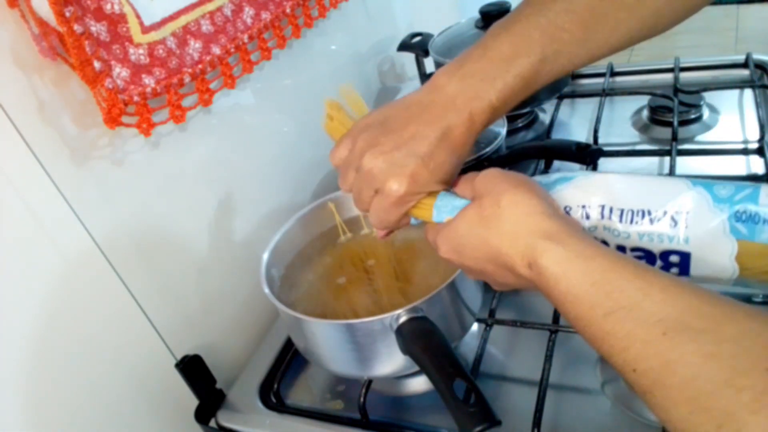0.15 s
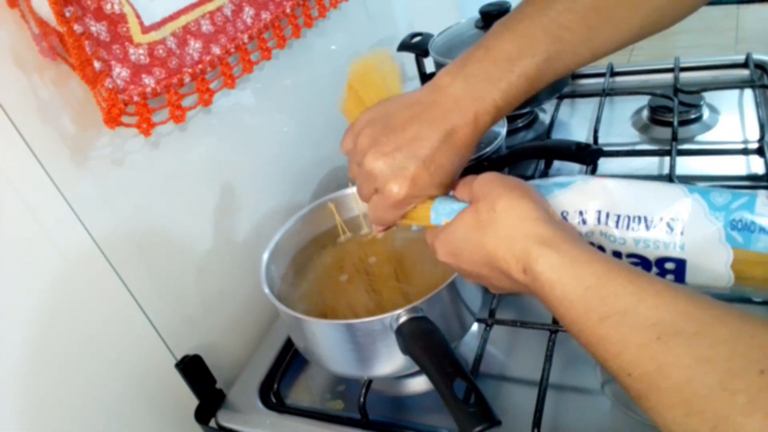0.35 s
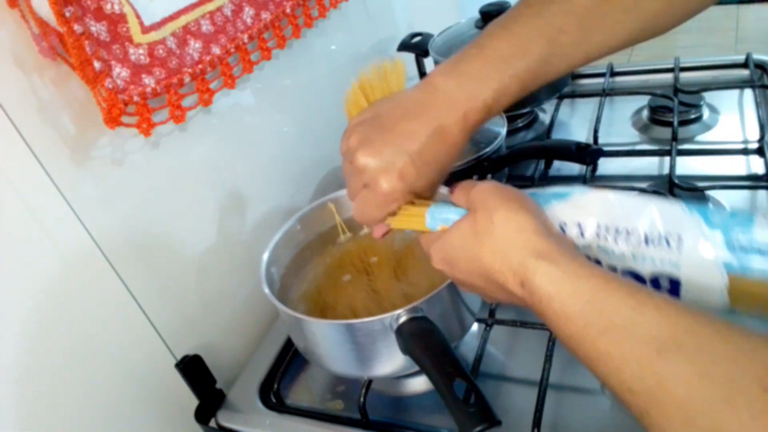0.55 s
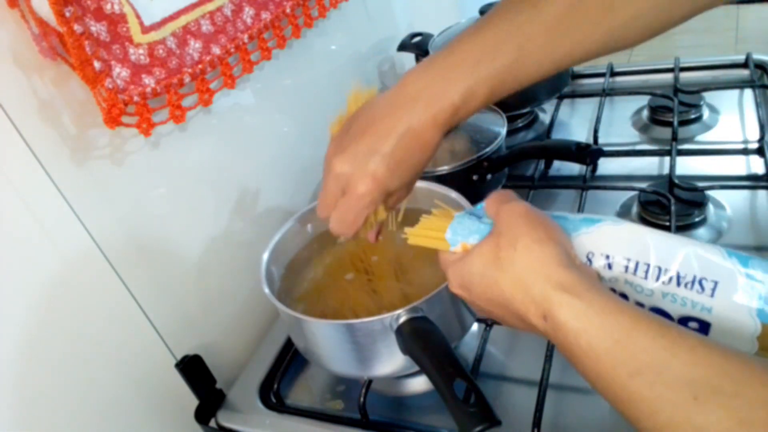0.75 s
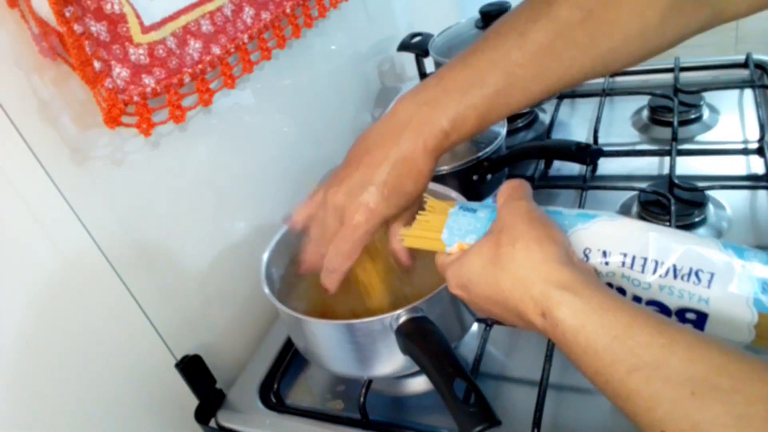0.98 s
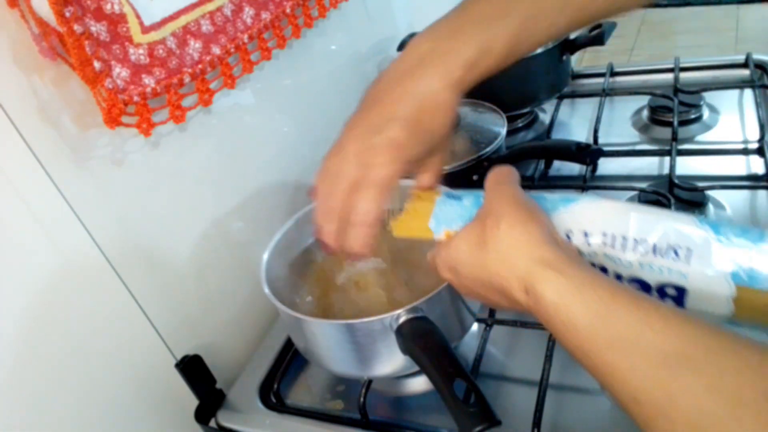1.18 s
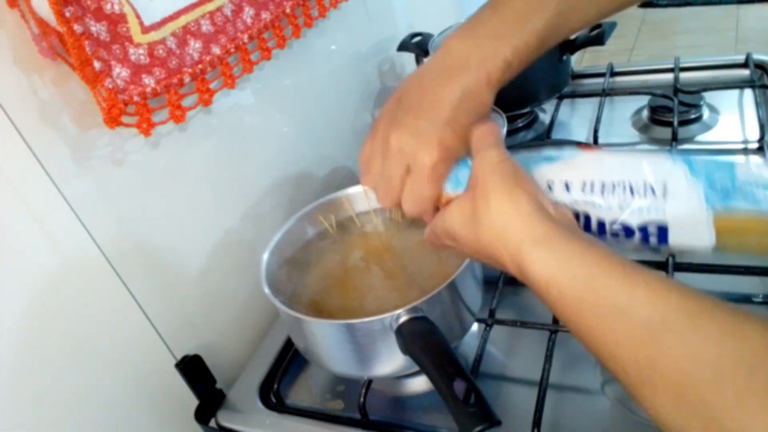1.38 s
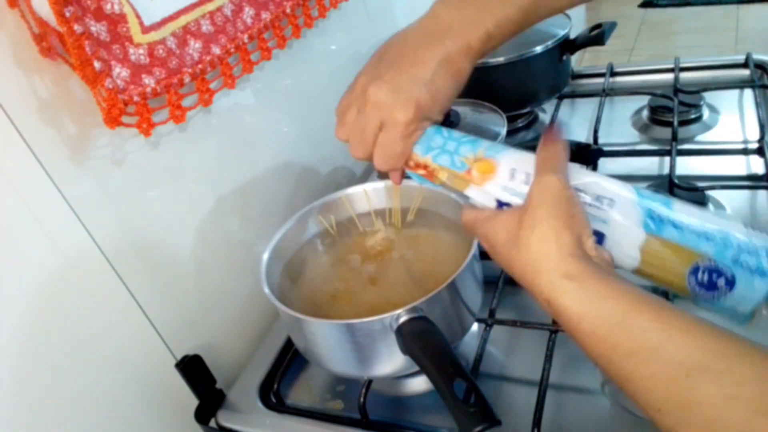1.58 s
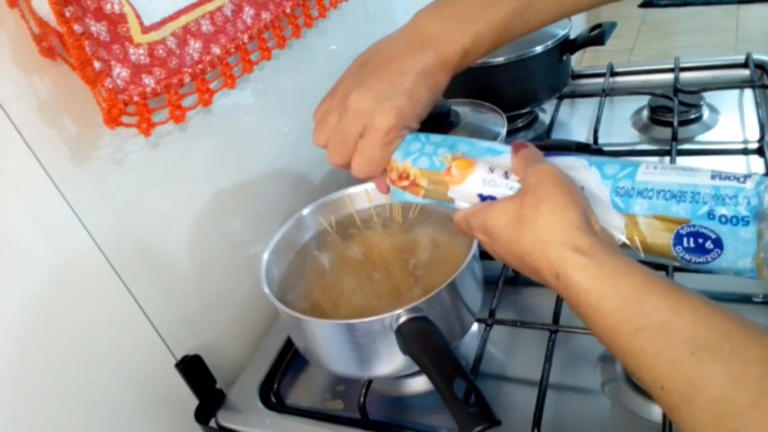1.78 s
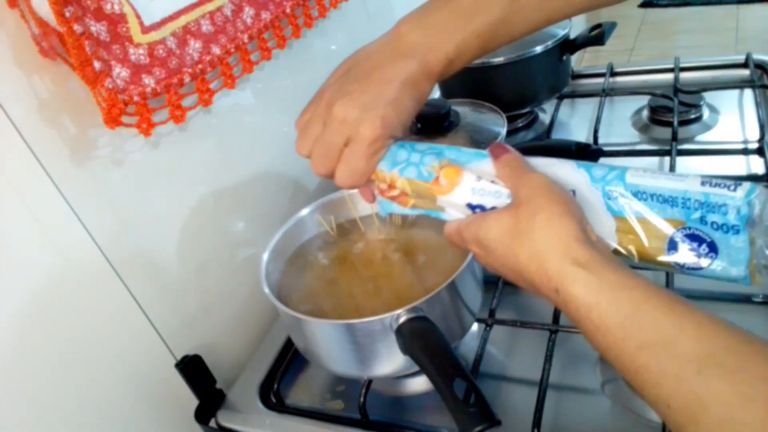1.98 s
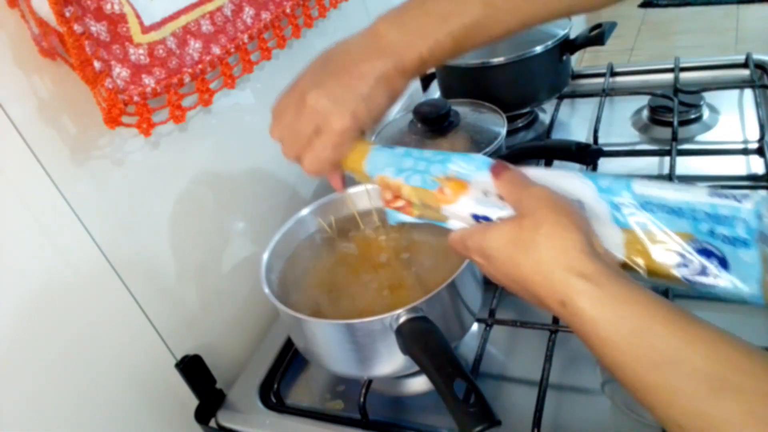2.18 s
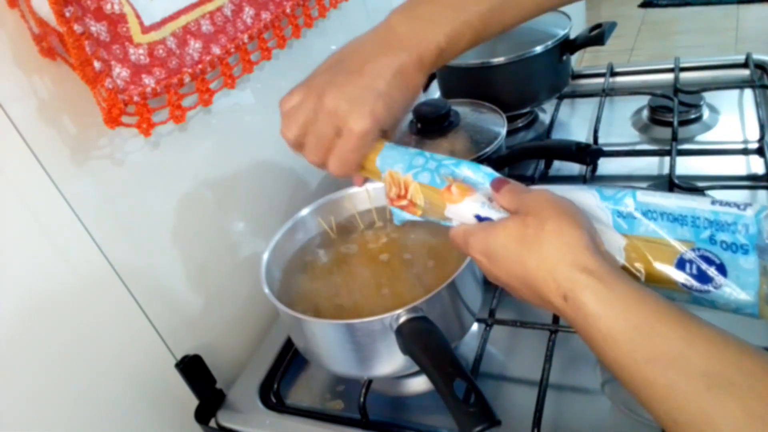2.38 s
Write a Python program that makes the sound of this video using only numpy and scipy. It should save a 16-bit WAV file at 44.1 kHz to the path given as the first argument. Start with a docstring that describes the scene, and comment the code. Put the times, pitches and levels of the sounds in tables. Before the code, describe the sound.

Dry spaghetti snapping in a rapid crackling burst over a pot, then a plastic packet crinkling

```python
"""Dry spaghetti snaps first: a bundle bent over a pot breaks strand after strand, then stragglers crack.
Each break is a noise click and a dying spray of splinters, high-passed at the strand's lowest note.
The jarred pot rings faintly as beating sines; later the pieces slide in as a hiss of random ticks.
The plastic packet is then gripped: ticks through wandering resonances crinkle, and single creases pop.
A tiled kitchen answers with decaying noise echoes, over a faint steady hush and hum."""
import sys
import numpy as np
from scipy import signal
from scipy.io import wavfile
from scipy.ndimage import uniform_filter1d, map_coordinates

SR = 44100
rng = np.random.default_rng(int(sys.argv[2]) if len(sys.argv) > 2 else 0)


def wav_out(sig):
    """Save sig, one row per channel (or a flat mono array), as 16-bit PCM at SR to the path in sys.argv[1]."""
    wavfile.write(sys.argv[1], SR, np.round(np.clip(np.atleast_2d(sig).T, -1, 1) * 32767).astype(np.int16))


N = 108045
TIME = np.arange(N) / SR  # s

# Strands breaking. Each row: start in seconds, level in dB, fade time in seconds.
STRAND_BREAKS = [(.010,-47,0.00093),(0.081,-48,0.0086),(0.0922,-39.5,0.0062),(0.1054,-27.5,0.0012),(.113,-37.5,0.025),(0.118,-51,0.0019),
                 (0.1617,-19,0.00078),(0.1687,-22.5,0.0008),(0.1778,-16.5,0.00079),(.1955,-20,.0004),(0.2095,-33,0.00045),(0.202,-26,0.0051),(.217,-23,0.0016),(0.2186,-20.5,0.0028),(0.2372,-23,0.00065),(0.241,-23.5,0.002),
                 (0.2639,-19,0.0014),(0.267,-24,0.0027),(0.2754,-17.5,0.002),(.300,-18,0.0023),(0.308,-22.5,0.005),(0.317,-26,0.0016),(0.3248,-12,0.0017),(.332,-30,0.005),(0.3408,-19.5,0.001),(.346,-22,0.0065),
                 (0.3723,-19.5,.005),(.381,-18,0.0016),(0.385,-21.5,0.00095),(0.4001,-22.5,0.0032),(.4054,-6.5,0.00022),(.412,-21,0.0039),(.4228,-15.5,0.0013),(0.4252,-13.5,0.0038),(.4305,-14,0.0022),
                 (0.5855,-40.5,0.0014),(.6112,-41.5,0.0039),(0.6451,-46.5,0.003),(.7168,-50,0.0022)]
# Last strands cracking inside the fist; the final two rows are broken pieces tapping.
# Each row: start in seconds, level in dB before FIST_DB is added, fade time in seconds.
LAST_CRACKS_AND_TAPS = [(0.7839,-34.5,0.00064),(0.79,-41.5,0.0022),(0.8083,-32.5,0.0013),(0.814,-40,.0009),(0.8613,-38.5,0.0021),(0.8734,-38,0.00093),(.888,-43,0.0021),(0.9038,-44,0.0015),(.911,-43,0.0027),(0.997,-52,0.0012),(1.0177,-46,0.0014)]
# Lowest note of a break, falling as the bundle opens. Each row: time in seconds, frequency in Hz.
LOWEST_NOTE = [(.08,2250),(.22,2200),(.29,1820),(.325,1410),(.35,700),(.40,620),(.43,430)]
# Spectrum of breaking pasta. Each row: frequency in Hz, relative level in dB.
PASTA_SPECTRUM = [(200,-24.5),(450,-19.5),(750,-8),(1200,-11.5),(2000,-9),(2800,-6.5),(4600,-1),(7000,-1),(8500,1),(12500,-0.5),(16000,-2)]
# Resonances of pieces held in the fist. Each row: frequency in Hz, width in Hz, level in dB.
STUB_RESONANCES = [(3070,120,7.5),(4090,46,-7),(4830,51,7),(5580,160,9),(7460,910,2)]
# Fine splintering and rubbing of the broken ends. Each row: time in seconds, level in dB.
STRAIN_LEVEL = [(.162,-36.5),(.19,-40),(.29,-44.5),(.31,-32),(.36,-44),(.40,-28),(.435,-39),(.48,-45),(.55,-57.5),(.61,-52),(.66,-51.5),(.69,-110)]
FIST_HZ, FIST_DB = 3320, 2.5  # lowest note and added level of the last cracks and taps
THUD_DB = -14.5  # gain left below the lowest note
STRAIN_PER_S, SPLINTERS_PER_S, SPLINTER_SPREAD_DB = 2000, 14000, -0.5
CRACK_S, SPRAY_RISE_S = 0.00031, 0.0012  # decay of the click, rise of the splinter spray
CLEAN_BREAK_S = 0.00046  # fade time at which click and spray share the energy equally
GRAIN_S = 0.00013  # decay of one tick

# Dull rustle of the hands as the bundle gives way. Each row: time in seconds, level in dB.
HANDS_LEVEL = [(.28,-94),(.325,-66),(.37,-81),(.41,-85),(.435,-60),(.485,-57.5),(.53,-63.5),(.60,-74),(.68,-103)]
# Spectrum of that rustle. Each row: frequency in Hz, relative level in dB.
HANDS_SPECTRUM = [(40,-27),(110,-20),(200,-10),(330,1.5),(500,5.5),(900,-6),(3000,-22.5),(16000,-43)]

# Broken pieces sliding into the pot. Each row: time in seconds, level in dB.
SLIDE_LEVEL = [(.992,-78),(1.0,-62),(1.007,-48),(1.019,-53.5),(1.026,-71),(1.04,-59),(1.06,-48),(1.088,-47),(1.12,-53.5),(1.17,-64.5),(1.22,-100)]
# Spectrum of the slide. Each row: frequency in Hz, relative level in dB.
SLIDE_SPECTRUM = [(200,-28),(1000,-10.5),(2000,-13.5),(4000,-8),(5600,-6),(7400,-13),(8200,3),(9500,5.5),(11000,-2),(16000,-3)]
# Resonances of the sliding pieces. Each row: frequency in Hz, width in Hz, level in dB.
SLIDE_RESONANCES = [(2000,56,5),(2690,49,9.5),(4050,45,3),(5600,60,6),(6040,50,3),(6500,60,11.5)]
SLIDE_PER_S, SLIDE_SPREAD_DB = 7800, 0.5

# Film rubbing on pasta. Each row: time in seconds, level of the crinkle in dB,
# level of the packet's hollow body in dB before its low cut.
HANDLING_LEVELS = [(1.37,-76,-82.5),(1.42,-65.5,-71),(1.46,-52,-63),(1.515,-43.5,-60.5),(1.558,-39.5,-61.5),(1.615,-43.5,-56),(1.627,-30,-43.5),(1.65,-46,-44.5),(1.67,-46.5,-57),(1.70,-38,-46.5),(1.72,-49.5,-54.5),(1.79,-45,-52.5),(1.85,-52.5,-67.5),(1.915,-50.5,-67),(1.95,-103,-68.5),(2.05,-63,-62),(2.08,-52,-67),(2.125,-51,-53),(2.16,-63,-70),(2.245,-49,-70),(2.29,-52.5,-64),(2.32,-62.5,-74),(2.45,-57,-55)]
# Spectrum of the film crinkle. Each row: frequency in Hz, relative level in dB.
FILM_SPECTRUM = [(200,-28.5),(800,-25.5),(1300,-4),(2000,-5.5),(3200,-0.5),(4400,-1.5),(6200,0.5),(7600,-7.5),(9400,0),(10800,-1.5),(12300,-5),(16000,-15.5)]
# Spectrum of the hollow body. Each row: frequency in Hz, relative level in dB.
BODY_SPECTRUM = [(120,-46),(240,-15),(400,5.5),(650,5.5),(900,-5.5),(1220,1),(1600,-6),(2600,-6),(6000,-18),(16000,-15)]
# Resonances of the film. Each row: frequency in Hz, width in Hz, level in dB.
FILM_RESONANCES = [(1190,204,0.5),(1946,290,1.5),(2540,130,-7.5),(4150,85,4.5),(5500,93,-16),(6320,200,-14.5),(9300,340,-5)]
# Lowest note of the packet as the grip shifts. Each row: time in seconds, frequency in Hz.
BODY_LOWEST_NOTE = [(1.4,330),(1.55,500),(1.64,330),(1.92,338),(2.08,1000),(2.45,1110)]
# Creases popping over. Each row: start in seconds, level in dB, pitch in Hz, fade time in seconds.
CREASE_POPS = [(1.2524,-49.5,12600,0.0012),(1.3793,-52.5,7000,0.0027),(1.392,-49,4000,0.0032),(1.430,-50,2000,0.0024),(1.477,-41,5950,0.0017),(1.526,-35,7000,0.0033),(1.552,-31.5,6900,0.0049),(1.563,-31,6500,0.0023),(1.6392,-26.5,8000,0.0077),
               (1.697,-33.5,1570,0.0021),(1.7132,-27.5,9100,0.0016),(1.726,-25,8900,0.0016),(1.746,-28.5,8000,0.0019),(1.760,-26,7940,0.0011),(1.775,-26.5,8450,0.00098),(1.791,-32,7000,0.0018),(1.808,-21,13700,0.00067),(1.8418,-45.5,970,0.0027),(1.8549,-33,4170,0.0013),(1.902,-42.5,540,0.0028),(1.9217,-35.5,5640,0.001),
               (1.9697,-42,10000,0.00068),(1.9995,-41,4420,0.003),(2.0366,-52,9100,.0006),(2.0474,-37.5,5500,0.0009),(2.061,-39,4500,0.0021),(2.07,-36.5,6500,0.00083),(2.0762,-35.5,2200,0.00087),(2.0855,-26.5,3750,0.0007),(2.130,-39.5,2500,0.0011),(2.1183,-35.5,6200,0.0013),(2.177,-43,8150,0.0016),(2.1948,-32.5,12200,0.0022),(2.245,-37.5,7100,0.0014),(2.2717,-40.5,6000,0.00074),(2.288,-37.5,9100,0.00081),(2.295,-40.5,1660,0.0018),(2.3442,-45,8000,0.0024),(2.392,-47,4200,0.0025)]
CRINKLES_PER_S, CRINKLE_SPREAD_DB = 1500, 3.5  # rate before the grip scales it
BODY_PER_S, BODY_SPREAD_DB = 3500, 3
LIGHT_GRIP_DB, CROWDING = -50, 1.2  # above a light grip the crinkles crowd together
CREASE_OCTAVES, CREASE_LOW_HZ = 1.14, 438  # breadth of a pop's spectrum, low cut
FLEX_SHARE, FLEX_S = 0.03525, 0.03  # rms pitch change as a fraction, length of each smoothing pass

# Reverberation time of the kitchen. Each row: frequency in Hz, time to fall 60 dB in seconds.
ROOM_T60 = [(250,1),(660,0.4),(1740,0.87),(4600,0.38),(9000,0.3951),(15000,0.1)]
# Spectrum of the reverberant tail. Each row: frequency in Hz, level in dB.
ROOM_SPECTRUM = [(250,-3.5),(1000,1),(4000,-2.5),(9000,-5),(16000,-4)]
NEAR_PER_S, NEAR_SPREAD_DB = 2500, 5
NEAR_DB, NEAR_S, WALL_S = -8.5, 0.011, 0.0022  # level and decay of near echoes, onset of the tail
CYCLE_HZ = 7  # rate at which the echo patterns take turns

# Faint rings of the jarred pot. Each row: start in seconds, frequency in Hz, level in dB,
# time to fall 60 dB in seconds.
POT_RINGS = [(.426,1440,-63,1.0),(0.688,1404,-63,1)]
POT_BEAT_HZ, POT_BEAT_DB = 7, -14  # spacing and relative level of the second mode

# Spectrum of the steady hush. Each row: frequency in Hz, relative level in dB per Hz.
FLOOR_SPECTRUM = [(15, -16.5), (25, -11.5), (87, -9), (170, -30.5), (223, -6), (641, -5.5), (962, -7.5),
                  (1070, -7.5), (1330, -5), (1610, -12.5), (16000, -16.5)]
FLOOR_DB, HUM_HZ, HUM_DB = -68.5, 67.4, -95
EDGE_HZ = 15800  # upper band limit


def strands():
    """Brittle fracture: strain releases fine splinter ticks, strands crack, and last pieces tap."""
    splintering = grains(STRAIN_PER_S, SPLINTER_SPREAD_DB, N) * level(STRAIN_LEVEL, 1)
    out = colour(splintering, pasta_tone(FIST_HZ))
    for s, db, fade_s in STRAND_BREAKS:
        low_hz = np.interp(s, *np.transpose(LOWEST_NOTE))
        add(out, s, amp(db) * colour(crack(fade_s), pasta_tone(low_hz)))
    for s, db, fade_s in LAST_CRACKS_AND_TAPS:
        tone = pasta_tone(FIST_HZ, STUB_RESONANCES, order=10)
        add(out, s, amp(db + FIST_DB) * colour(crack(fade_s), tone))
    return out


def crack(fade_s, count=2048):
    """Impulsive energy release: one sharp break, then an exponentially dying spray of splinters."""
    t = np.arange(count) / SR
    spray = grains(SPLINTERS_PER_S, SPLINTER_SPREAD_DB, count)
    spray = spray * np.exp(-t / fade_s) * (1 - np.exp(-t / SPRAY_RISE_S))
    click = rng.standard_normal(count) * np.exp(-t / CRACK_S)
    click_share = 1 / (1 + (fade_s / CLEAN_BREAK_S) ** 2)  # the shortest breaks are mostly click
    click = np.sqrt(click_share) * click / np.linalg.norm(click)
    spray = np.sqrt(1 - click_share) * spray / (np.linalg.norm(spray) + 1e-9)
    return (click + spray) * np.sqrt(fade_s * SR / 2)  # a longer fade carries more energy


def pasta_tone(low_hz, modes=(), order=18):
    """High-pass radiation: a breaking strand sounds little below its lowest note."""
    def tone(f):
        high_pass = 1 / np.sqrt(1 + (low_hz / (f + 1)) ** order)
        return read(PASTA_SPECTRUM, f) + ring(modes, f) + 20 * np.log10(amp(THUD_DB) + high_pass)
    return tone


def hands():
    """Friction noise: the hands jerk apart with a dull rustle of filtered noise."""
    return colour(rng.standard_normal(N) * level(HANDS_LEVEL, 1), lambda f: read(HANDS_SPECTRUM, f))


def slide():
    """Granular contact noise: pieces hiss over each other and over the rim as dense small impacts."""
    contacts = grains(SLIDE_PER_S, SLIDE_SPREAD_DB, N) * level(SLIDE_LEVEL, 1)
    return colour(contacts, lambda f: read(SLIDE_SPECTRUM, f) + ring(SLIDE_RESONANCES, f))


def packet():
    """Buckling film: fine crinkle and hollow rustle under the hands, with single creases popping."""
    out = flex(crinkle() + hollow_body())
    for s, db, hz, fade_s in CREASE_POPS:
        add(out, s, amp(db) * colour(crack(fade_s), crease_tone(hz)))
    return out


def crinkle():
    """Random buckling: a firmer grip makes the film's small clicks both louder and more frequent."""
    grip = level(HANDLING_LEVELS, 1)
    per_s = CRINKLES_PER_S * (grip / amp(LIGHT_GRIP_DB) + 0.14) ** CROWDING
    clicks = grains(per_s, CRINKLE_SPREAD_DB, N) * grip
    return colour(clicks, lambda f: read(FILM_SPECTRUM, f) + ring(FILM_RESONANCES, f))


def hollow_body():
    """Cavity radiation: the packet's rustle is cut below a lowest note that shifts with the grip."""
    rustle = grains(BODY_PER_S, BODY_SPREAD_DB, N) * level(HANDLING_LEVELS, 2)
    rustle = colour(rustle, lambda f: read(BODY_SPECTRUM, f) + ring(FILM_RESONANCES, f))
    hz, when, spectrum = signal.stft(rustle, SR, nperseg=512)
    low_hz = np.interp(when, *np.transpose(BODY_LOWEST_NOTE))
    low_cut = np.sqrt(1 + (low_hz / (hz[:, None] + 1)) ** 6)
    return signal.istft(spectrum / low_cut, SR, nperseg=512)[1][:N]


def crease_tone(hz):
    """Snap-through of a crease: a broad peak at its pitch, on film resonances randomly shifted."""
    stretch = 1 + FLEX_SHARE * rng.standard_normal()

    def tone(f):
        octaves_off = np.log2((f + 1) / hz)
        loss = 1 + (octaves_off / CREASE_OCTAVES) ** 2 + (CREASE_LOW_HZ / (f + 1)) ** 4
        return ring(FILM_RESONANCES, f / stretch) - 20 * np.log10(loss)
    return tone


def flex(x):
    """Varying delay shifts pitch: all the packet's resonances wander together as it is squeezed."""
    width = int(FLEX_S * SR)
    drift = uniform_filter1d(uniform_filter1d(rng.standard_normal(N), width), width)
    lag = FLEX_SHARE * drift / np.std(np.diff(drift))  # samples
    return map_coordinates(x, [np.arange(N) + lag], order=5, mode="mirror")


def kitchen(x, count=3):
    """Diffuse reverberation: noise echo patterns take turns at a steady rate, keeping the room untuned."""
    out = x.copy()
    for k in range(count):
        # the squared shares add up to a constant, so the total energy sent stays even
        share = np.sqrt(2 / count) * np.cos(np.pi * (CYCLE_HZ * TIME + k / count))
        out += signal.fftconvolve(x * share, echoes())[:N]
    return out


def echoes():
    """Room impulse response: quick reflections from stove and wall, then the tiled room's tail."""
    t = TIME[:SR]
    near = grains(NEAR_PER_S, NEAR_SPREAD_DB, SR) * np.exp(-t / NEAR_S) * (t > .002)
    hz, when, spectrum = signal.stft(rng.standard_normal(SR), SR, nperseg=256)
    t60 = read(ROOM_T60, hz)[:, None]
    decay = amp(read(ROOM_SPECTRUM, hz)[:, None] - 60 * when / t60)
    unit_energy = np.sqrt(2 * np.log(1000) / (t60 * SR))  # evens out long and short decays
    tail = signal.istft(spectrum * decay * unit_energy, SR, nperseg=256)[1][:SR]
    tail = tail * (1 - np.exp(-(t / WALL_S) ** 2))
    return tail + amp(NEAR_DB) * near / np.linalg.norm(near)


def pot():
    """Beating of close modes: the jarred pot rings faintly as two neighbouring decaying sines."""
    out = np.zeros(N)
    for s, hz, db, t60 in POT_RINGS:
        main = np.sin(2 * np.pi * hz * TIME)
        neighbour = amp(POT_BEAT_DB) * np.sin(2 * np.pi * (hz + POT_BEAT_HZ) * TIME)
        add(out, s, amp(db - 60 * TIME / t60) * (main + neighbour))
    return out


def floor():
    """Stationary noise: the kitchen's faint steady hush, with a low sinusoidal hum."""
    hush = colour(rng.standard_normal(N), lambda f: read(FLOOR_SPECTRUM, f), size=8192)
    return amp(FLOOR_DB) * hush + amp(HUM_DB) * np.sin(2 * np.pi * HUM_HZ * TIME)


def grains(per_s, spread_db, count, kinds=20):
    """Shot noise: random ticks of uneven size, each of one of a few random colours; overall rms 1."""
    size = amp(spread_db * np.minimum(rng.exponential(1, count), 4)) / np.sqrt(per_s / SR)
    happens = rng.random(count) < per_s / SR
    clicks = size * rng.choice([-1., 1.], count) * happens
    kind = rng.integers(0, kinds, count)
    ticks = rng.standard_normal((kinds, 64)) * np.exp(-TIME[:64] / GRAIN_S)
    x = np.zeros(count)
    for k, tick in enumerate(ticks):
        x += np.convolve(clicks * (kind == k), tick / np.linalg.norm(tick))[:count]
    return x / np.sqrt(np.mean(x ** 2) + 1e-12)


def ring(modes, f):
    """Resonance: a few peaks added to a flat response, in dB."""
    peaks = sum(amp(db) / (1 + (2 * (f - hz) / width) ** 2) for hz, width, db in modes)
    return 20 * np.log10(1 + peaks)


def colour(x, shape, size=2048):
    """Minimum-phase filtering at unit energy; shape gives relative dB for each frequency."""
    gain = amp(np.maximum(shape(abs(np.fft.fftfreq(size, 1 / SR))), -90))
    # the Hilbert transform of the log gain gives the phase of a causal filter
    response = np.exp(np.conj(signal.hilbert(np.log(gain))))
    taps = np.fft.ifft(response).real[:size // 2]
    return signal.fftconvolve(x, taps / np.linalg.norm(taps))[:len(x)]


def level(rows, column):
    """Envelope: gain interpolated in dB along a level curve, at -120 dB before it starts."""
    rows = np.array(rows)
    return amp(np.interp(TIME, rows[:, 0], rows[:, column], left=-120))


def read(points, hz):
    """Logarithmic pitch scale: interpolates a table over log frequency."""
    f, value = np.transpose(points)
    return np.interp(np.log(hz + 1), np.log(f + 1), value)


def amp(db):
    """Decibel law: level in dB to amplitude gain."""
    return 10 ** (np.asarray(db) / 20)


def add(mix, s, sound):
    """Superposition: adds a sound to the mix, in place, from time s in seconds."""
    part = mix[max(round(s * SR), 0):][:len(sound)]
    part += sound[:len(part)]


def scene():
    """Superposition: the handled sources excite the room, while pot and floor are added directly."""
    handled = strands() + hands() + slide() + packet()
    return (kitchen(handled) + pot() + floor())[None]


def record(dry):
    """Band limitation: a linear-phase low-pass removes the highest treble."""
    low_pass = signal.firwin(301, EDGE_HZ, window=("kaiser", 8), fs=SR)
    return signal.oaconvolve(dry, low_pass[None], "same")


dry = scene()
out = record(dry)
wav_out(out)
```